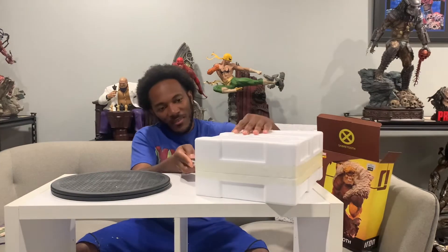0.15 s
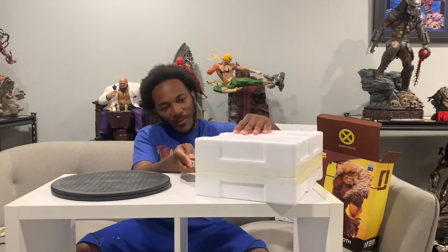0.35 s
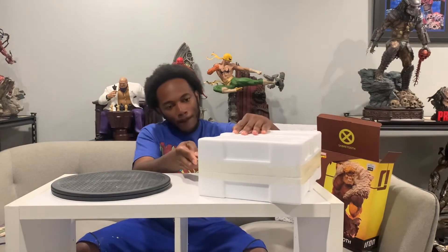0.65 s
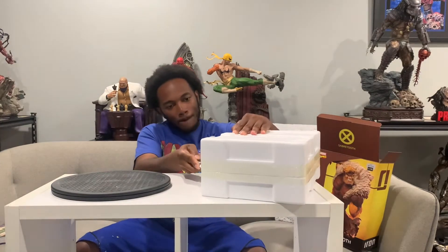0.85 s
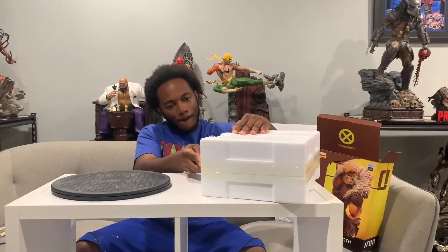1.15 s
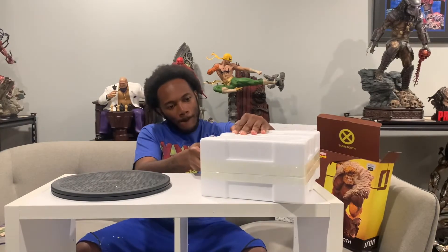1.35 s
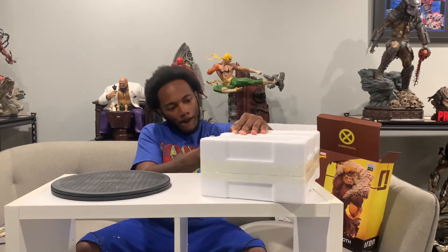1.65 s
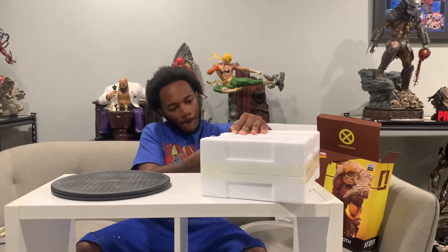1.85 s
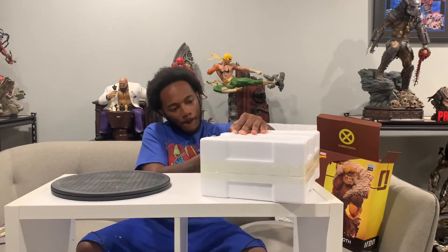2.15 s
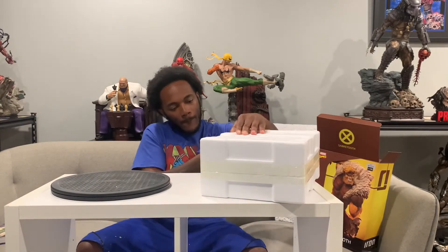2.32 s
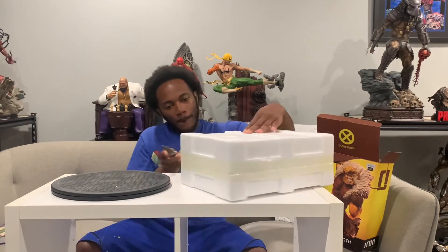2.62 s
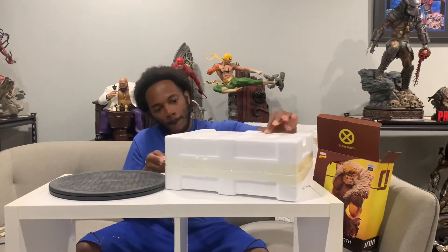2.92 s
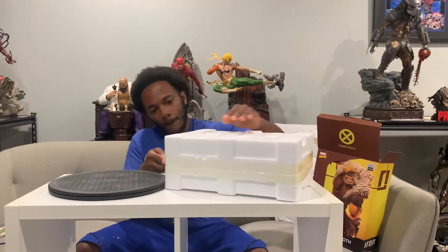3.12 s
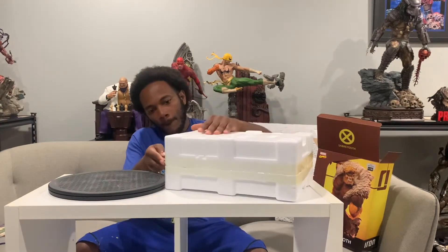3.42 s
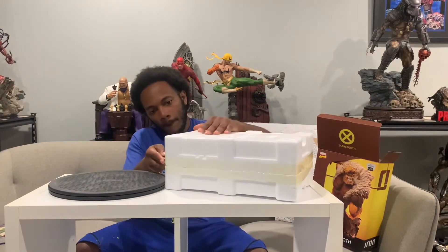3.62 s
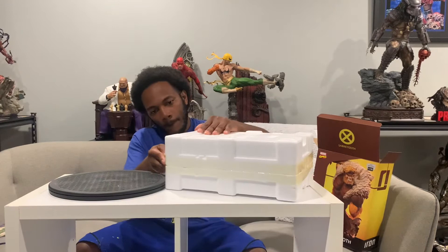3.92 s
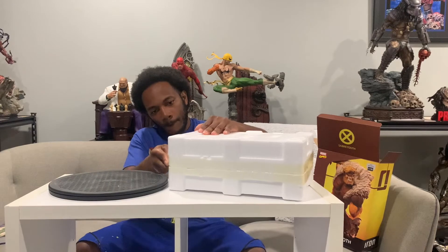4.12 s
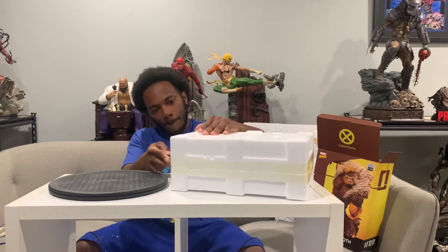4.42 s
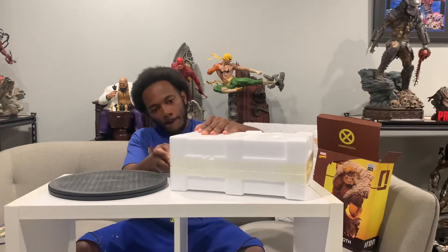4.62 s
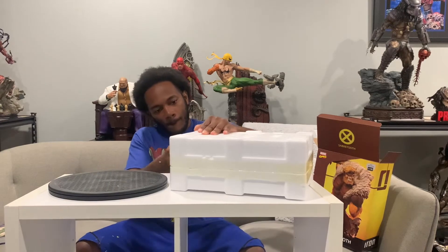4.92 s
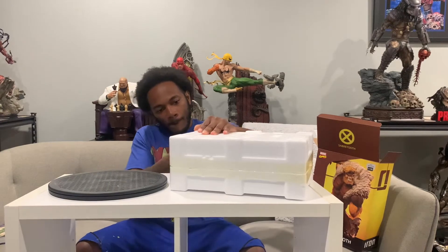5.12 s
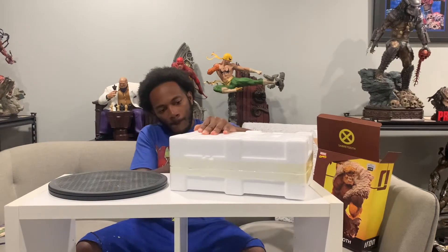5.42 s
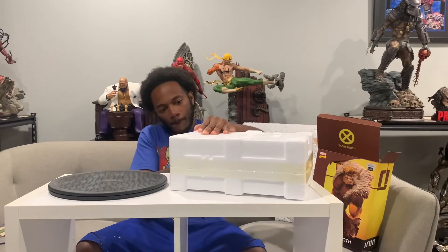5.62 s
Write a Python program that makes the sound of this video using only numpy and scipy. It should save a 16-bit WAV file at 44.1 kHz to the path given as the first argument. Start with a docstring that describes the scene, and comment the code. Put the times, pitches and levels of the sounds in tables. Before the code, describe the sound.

Dry foam rubbing and scraping on a hollow packing case, broken by snapping tape, two short harsh rips, light blade clicks and a set-down thud indoors.

```python
"""In a quiet living room a polystyrene packing case is opened on a table, with a stereo microphone across the room.
A blade ratchets out in light clicks, snaps into the packing tape, rips it twice and is drawn along the seam:
sharp cracks and volleys of slips. Between the cuts the case is slid round, set down and rubbed by a hand in
short strokes: stick-slip noise, crunches and thuds. The hollow foam colours the contacts; a low rumble and
faint hiss lie behind."""
import sys
import numpy as np
from scipy import signal
from scipy.fft import rfft, irfft, next_fast_len
from scipy.io import wavfile

SR = 44100
rng = np.random.default_rng(int(sys.argv[2]) if len(sys.argv) > 2 else 0)


def materialize(psi):
    """Save the field psi as 16-bit PCM at rate SR to the path in sys.argv[1].

    A 1-D psi becomes a single channel; in a 2-D psi each row is a channel.
    """
    bounded = np.clip(np.atleast_2d(psi).T, -1, 1)
    quanta = np.round(bounded * 32767).astype(np.int16)
    wavfile.write(sys.argv[1], SR, quanta)


N = 254310
TIME = np.arange(N) / SR

# resonances of the hollow case: (frequency [Hz], width [Hz], lift [dB])
CASE_RESONANCES = [(600, 200, 8), (758, 150, -6.5), (993, 360, 5.5), (1535, 370, 5.5), (1954, 240, 8),
                   (2513, 480, 6), (3006, 200, 5.5), (3480, 140, 4)]
# bright hiss of the finest slips: (frequency [Hz], level [dB])
HISS_COLOUR = [(2000, -22.5), (3800, -3), (4800, -1.5), (9000, -3), (15500, 2.5)]


def undb(db):
    """Decibels to gain."""
    return 10 ** (np.asarray(db) / 20)


def unit(x):
    """Scale to an rms of one."""
    return x / np.sqrt(np.mean(x ** 2))


def unit_energy(x):
    """Scale a short sound to an energy of one."""
    return x / np.sqrt(np.sum(x ** 2, axis=-1, keepdims=True))


def lookup(hz, points):
    """Read a table on a log-frequency axis."""
    f, value = np.transpose(points)
    return np.interp(np.log(hz + 1e-9), np.log(f), value)


def colour(x, points, peaks=()):
    """Causal minimum-phase filter from a spectrum outline and resonances on top of it."""
    size = 4096
    hz = np.arange(size // 2 + 1) * SR / size
    db = lookup(hz, points)
    for f, width, lift in peaks:
        db = db + lift / (1 + (2 * (hz - f) / width) ** 2)
    # folding the cepstrum forward in time makes the filter causal
    cepstrum = irfft(np.log(undb(db)))
    cepstrum[1:size // 2] *= 2
    cepstrum[size // 2 + 1:] = 0
    response = irfft(np.exp(rfft(cepstrum)))
    return signal.fftconvolve(x, response)[:len(x)]


def add(track, s, sound):
    """Mix a short sound into a track at time s."""
    start = max(int(s * SR), 0)
    track[start:start + len(sound)] += sound[:N - start]


def wander(rate):
    """Smooth random drift with an rms of one, through `rate` random points per second."""
    return unit(np.interp(TIME * rate, np.arange(N), rng.standard_normal(N)))


def slips(rate, spread_db):
    """Stick-slip: tiny releases of uneven size at random moments, `rate` per second on average."""
    happens = rng.random(N) < rate / SR
    size = undb(spread_db * np.clip(rng.standard_normal(N), -2, 2))
    direction = rng.choice([-1, 1], N)
    return unit(happens * size * direction)


def ring(modes):
    """One blow on a set of damped modes, a little different at each spot."""
    t = TIME[:SR // 4]
    detune = 1 + 0.015 * rng.standard_normal(len(modes))
    blow = np.zeros(len(t))
    for (hz, db, t60), factor in zip(modes, detune):
        blow += undb(db - 60 * t / t60) * np.sin(2 * np.pi * hz * factor * t)
    return unit_energy(blow)


def crack(travel_s):
    """A point release spreads as a bending wave: highs arrive first, 1 kHz after travel_s."""
    size = SR // 10
    khz = np.arange(size // 2 + 1) * SR / size / 1000
    cycles = 2 * travel_s * 1000 * np.sqrt(khz)  # phase lag; its slope is the delay
    return irfft(np.exp(-2j * np.pi * cycles), size)


def crackle(decay):
    """A short burst of tiny fractures, dying by a factor e in each `decay` seconds."""
    t = TIME[:SR // 10]
    return unit_energy(rng.standard_normal(len(t)) * np.exp(-t / decay))


def crackling_crack(travel_s, crackle_s, decay):
    """A crack with its crackle: the longer the crackle, the larger its share of the energy."""
    return unit_energy(crack(travel_s) + np.sqrt(decay / crackle_s) * crackle(decay))


def stroke(start, run_up, length):
    """Speed of one stroke: a smooth start, a hold and a quick stop."""
    release_db_per_s = 209.5  # every stroke dies away alike
    age = np.maximum(TIME - start, 0)
    attack = np.sin(np.pi / 2 * np.minimum(age / run_up, 1)) ** 2
    return attack * undb(-release_db_per_s * np.maximum(age - length, 0))


def room_tone():
    """A low, gently swelling rumble of the house under faint hiss, as independent mid and side."""
    # rumble and hiss of the quiet house: (frequency [Hz], level [dB])
    air_colour = [(25, -39), (38, -17.5), (52, 3.5), (72, 5), (92, -6.5), (150, -4.5), (200, -9),
                  (270, -18), (490, -24), (700, -46), (1900, -55), (2550, -41.5), (3300, -49.5),
                  (8000, -60), (16000, -63.5)]
    air = np.array([unit(colour(rng.standard_normal(N), air_colour)) for _ in range(2)])
    swell_db = 0.9 * wander(rate=3.3)
    return air * undb(-51 + swell_db)


def ticks(travel_s=0.00031, crackle_s=0.0028):
    """Light, bright clicks, each a crack with crackle: a hand landing, the blade's ratchet, small taps."""
    # each click: (time [s], level [dB], crackle decay [s])
    tick_events = [(0.497, -21, .0015), (3.193, -42, 0.008), (3.461, -48, 0.0011), (3.577, -34, 0.013),
                   (3.606, -28.5, 0.0007), (3.6665, -35, .0005), (3.7002, -32, 0.00035),
                   (3.7297, -29, 0.00037), (3.7808, -34, .0006), (3.785, -25.5, 0.0099),
                   (3.8322, -31, 0.00046), (3.8802, -34, 0.00055), (3.927, -31.5, 0.0012),
                   (4.043, -21.5, 0.0041)]
    # bright edge of a click: (frequency [Hz], level [dB])
    tick_colour = [(100, -29.5), (600, 6.5), (2500, -1.5), (5000, -3), (6500, 6.5), (8500, -2),
                   (12000, 5.5), (15500, 6)]
    out = np.zeros(N)
    for s, db, decay in tick_events:
        add(out, s, undb(db) * crackling_crack(travel_s, crackle_s, decay))
    return colour(out, tick_colour)


def bumps(scuff_db=11):
    """The light case rocks and meets the table: a hollow thud with a dry scuff of foam."""
    # each rock, set-down or jolt: (time [s], thud level [dB], scuff level against the thud [dB] before scuff_db)
    bump_events = [(0.029, -26, -8), (2.697, -12, -11.5), (2.7742, 1, -8), (2.804, -19, -4.5),
                   (2.993, -18, -37.5), (3.218, -18, -39), (3.682, -15, -33), (4.333, -3.5, -30)]
    # ring of the table under the case: (frequency [Hz], level [dB], t60 [s])
    table_modes = [(122, -33, 0.057), (163.9, 11, 0.24), (186, 16, 0.1), (250, 1, 0.078), (285, -5, 0.13),
                   (334, -0.5, 0.091)]
    # dry scuff of foam on table: (frequency [Hz], level [dB])
    scuff_colour = [(60, -2), (280, 10), (450, 5), (700, -7), (1250, -3), (1700, -4), (2600, -7),
                    (3200, -27), (15000, -40)]
    thuds, scuffs = np.zeros(N), np.zeros(N)
    for s, db, contact_db in bump_events:
        add(thuds, s, undb(db) * ring(table_modes))
        add(scuffs, s, undb(db + contact_db) * crackle(decay=0.004))
    return thuds + undb(scuff_db) * colour(scuffs, scuff_colour)


def drags(width_octaves=0.59, grip_db=2):
    """Skin sticks and slips on the foam and sounds one broad resonance, which depends on where the palm lies."""
    # each hollow rasp of the palm: (start [s], run-up [s], length [s], level [dB], centre [Hz])
    palm_drags = [(0.367, 0.077, 0.069, -46.5, 1297), (0.583, 0.015, 0.022, -47.5, 840),
                  (1.16, 0.036, 0.19, -48.5, 1060), (4.642, 0.024, 0.046, -42, 1040),
                  (5.02, .03, 0.14, -47.5, 1630)]
    grain = slips(rate=1400, spread_db=2.0) * undb(grip_db * wander(rate=70))
    out = np.zeros(N)
    for start, run_up, length, db, centre_hz in palm_drags:
        edges_hz = centre_hz * 2 ** (width_octaves * np.array([-0.5, 0.5]))
        band = signal.butter(2, edges_hz, "band", fs=SR, output="sos")
        rasp = unit(signal.sosfilt(band, grain))
        out += undb(db) * stroke(start, run_up, length) * rasp
    return out


def crunches():
    """A patch of beads collapses and sounds the hollow case; the softer the contact, the duller the crunch."""
    # the foam catches under hand or blade and gives: (time [s], level [dB], upper edge [Hz], decay [s])
    crunch_events = [(0.025, -25.5, 1550, 0.0044), (0.032, -20.5, 535, 0.015), (.465, -14, 1405, 0.013),
                     (0.6026, -17, 1370, 0.0059), (2.11, -19, 790, 0.0048), (2.303, -18, 1100, 0.0035),
                     (2.379, -23.5, 1780, 0.0054), (2.44, -17.5, 1120, 0.012), (2.497, -18.5, 1300, .008),
                     (2.768, -16.5, 1770, 0.0027), (2.779, -14.5, 2010, 0.016),
                     (3.287, -27.5, 2760, 0.0063), (3.57, -30, 2490, 0.01), (4.0128, -19, 2520, 0.0007),
                     (4.0440, -13, 1850, 0.003), (4.586, -14, 1200, 0.0083), (4.6494, -3.5, 2540, 0.002),
                     (4.678, -3, 1390, 0.017), (4.8092, -3.5, 2700, 0.0038), (4.821, -11, 2500, 0.0046),
                     (4.876, -2, 3000, 0.0048), (4.888, -10.5, 3120, 0.0076), (4.9614, -5.5, 3140, 0.004)]
    # body of a crunch: (frequency [Hz], level [dB])
    crunch_colour = [(100, -25), (230, -6), (350, 5), (600, -2.5), (1000, -0.5), (1700, -6), (3200, 1.5)]
    out = np.zeros(N)
    for s, db, edge_hz, decay in crunch_events:
        soft = signal.butter(4, edge_hz, fs=SR, output="sos")
        collapse = colour(crackle(decay), crunch_colour, CASE_RESONANCES)
        add(out, s, undb(db) * unit_energy(signal.sosfilt(soft, collapse)))
    return out


def rubbing(catch_db=-7, coarse_grip_db=1.33, fine_grip_db=1.5):
    """Foam beads catch and let go: coarse slips and rarer catches drive the hollow body, fine ones hiss."""
    # each stroke of hand or blade: (start [s], run-up [s], length [s], scratch level [dB],
    # foam body against scratch [dB], hiss against scratch [dB])
    rub_strokes = [(-.08, 0.14, 0.097, -61.5, 4, 4.5), (0.102, 0.11, 0.16, -62, 6, -8),
                   (0.222, 0.1, 0.2, -59.5, 3.5, 0.5), (0.323, 0.14, 0.16, -50, 2.5, 5.5),
                   (0.563, 0.064, 0.061, -47, 6.5, 5.5), (0.783, 0.046, 0.31, -49.5, -10.5, 0),
                   (1.1, 0.062, 0.71, -43, -1, 8.5), (1.814, 0.12, 0.16, -49.5, 2.5, 7),
                   (2.001, 0.12, 0.22, -51, 4, 8), (2.123, 0.05, 0.044, -63, -1, 38.5),
                   (2.256, 0.13, 0.27, -51.5, 5.5, 10), (2.436, 0.1, 0.34, -56, 2.5, 14),
                   (3.183, 0.014, 0.055, -65, -1, 11.5), (3.218, 0.067, 0.15, -59.5, 0, -0.5),
                   (3.424, 0.088, 0.56, -62, 6.5, -1.5), (3.939, 0.044, 0.1, -49, 6, 5.5),
                   (4.096, 0.085, 0.11, -47.5, 0, 4.5), (4.469, 0.083, 0.23, -43.5, -8, 3),
                   (4.572, 0.087, 0.13, -33.5, -2, 6.5), (4.709, 0.092, 0.3, -39, -4, 5),
                   (4.98, 0.041, 0.16, -46, -0.5, 7.5), (5.087, 0.04, 0.14, -50, 3.5, 6),
                   (5.2, 0.056, 0.12, -51.5, -1.5, 5.5), (5.305, 0.053, 0.12, -57.5, 1, 5.5),
                   (5.454, 0.072, 0.13, -45.5, -7, 7.5), (5.616, 0.086, 0.17, -60.5, 5, 8)]
    # low foam body of the rubbing: (frequency [Hz], level [dB])
    body_colour = [(60, -23), (150, -9), (300, 3.5), (550, 3.5), (1200, 1), (1550, -16.5), (2100, -37),
                   (4000, -39)]
    # scratch of the surface: (frequency [Hz], level [dB])
    scratch_colour = [(600, -31.5), (1200, -6), (1600, 2.5), (2800, 0.5), (4200, 1), (5200, -4),
                      (9000, -34.5)]
    power = np.zeros((3, N))
    for start, run_up, length, db, body_db, hiss_db in rub_strokes:
        layer_power = undb([db, db + body_db, db + hiss_db]) ** 2
        power += np.outer(layer_power, stroke(start, run_up, length) ** 2)
    scratch_gain, body_gain, hiss_gain = np.sqrt(power)
    grip = unit(wander(rate=60) + wander(rate=14))  # quick flutter on slower surges
    coarse = slips(rate=1300, spread_db=2.5)
    fine = unit(coarse + 5.7 * slips(rate=9000, spread_db=3))
    grain = coarse + undb(catch_db) * slips(rate=38, spread_db=1.0)
    body = unit(colour(grain, body_colour, CASE_RESONANCES)) * body_gain
    scratch = unit(colour(grain, scratch_colour, CASE_RESONANCES)) * scratch_gain
    hiss = unit(colour(fine, HISS_COLOUR)) * hiss_gain
    return undb(coarse_grip_db * grip) * body + undb(fine_grip_db * grip) * (scratch + hiss)


def rips():
    """The blade creeps, breaks free and races through the tape in jerks: a volley of slips shakes the case."""
    # fast rips along the seam: (break [s], level [dB], run-up [s], creep before the break [dB], hold [s],
    # decay [s], hiss against rasp [dB], shaking of the case [0-1])
    rip_events = [(0.8773, 10, 0.005, -8.5, 0.016, 0.0035, -3, .15),
                  (4.3265, 13, 0.0053, -6.5, 0.017, 0.022, 2, 0.8)]
    # rasp of the tearing tape: (frequency [Hz], level [dB])
    rip_colour = [(40, -38.5), (100, -38), (160, 0.5), (300, 1), (1000, -0.5), (2000, -2), (4200, 4),
                  (6000, -20.5), (12000, -36.5)]
    # narrow resonances that only a hard rip wakes: (frequency [Hz], width [Hz], lift at full shaking [dB])
    shaken_resonances = [(778, 14, 10), (1070, 38, 4), (1113, 30, 8.5), (1595, 70, 6), (1840, 110, 5.5),
                         (2030, 28, 9), (2400, 40, 0.5), (3550, 37, 15.5), (4153, 45, 11.5)]
    out = np.zeros(N)
    for s, db, run_up, creep_db, hold, decay, hiss_db, shake in rip_events:
        volley = slips(rate=7000, spread_db=1.5) * undb(1.5 * wander(rate=550))
        woken = [(hz, width, shake * lift) for hz, width, lift in shaken_resonances]
        before = np.maximum(s - TIME, 0)
        after = np.maximum(TIME - s - hold, 0)
        speed = np.exp(-before / run_up - after / decay)
        speed = speed * undb(np.where(TIME < s, creep_db, 0))
        rasp = unit_energy(speed * colour(volley, rip_colour, CASE_RESONANCES + woken))
        hiss = unit_energy(speed * colour(volley, HISS_COLOUR))
        out += undb(db) * (rasp + undb(hiss_db) * hiss)
    return out


def snaps(travel_s=0.001226, crackle_s=0.0014):
    """Each release is a sharp crack that crackles out while the foam wall springs back."""
    # the tape gives way under the blade: (time [s], level [dB], knock of the foam wall against it [dB],
    # crackle decay [s])
    snap_events = [(0.8069, -11.5, 4, 0.0028), (0.8521, -9.5, 5, 0.0029), (0.8794, 2.5, -3, 0.0078),
                   (1.0777, -13, 14.5, 0.0019), (1.0888, -4.5, -20, 0.001), (1.1224, -2, -2.5, 0.0036),
                   (1.1784, -4, -2, 0.0016), (1.7314, -3.5, -5.5, 0.0042), (1.8105, -1, -12, 0.0016),
                   (4.3272, 0, -7, 0.0014), (4.3445, -1.5, -12, 0.0012), (4.439, -12, -2.5, 0.0026),
                   (4.5236, -19, 4.5, 0.0022), (4.8093, -9, -5, 0.0063), (4.8750, 0, -24, 0.002),
                   (4.887, -13, -21, 0.0026)]
    # ring of a foam wall: (frequency [Hz], level [dB], t60 [s])
    wall_modes = [(510, -12, .025), (650, -9, .022), (870, -4, .018), (985, 0, .024), (1110, -4, .02),
                  (1260, -4, .016), (1620, -9, .012)]
    # sharp edge of a crack: (frequency [Hz], level [dB])
    crack_colour = [(60, -35.5), (200, -36), (500, 8.5), (1000, 9.5), (3000, 4), (6000, 6.5), (11000, 6.5),
                    (15500, 10)]
    cracks, knocks = np.zeros(N), np.zeros(N)
    for s, db, knock_db, decay in snap_events:
        add(cracks, s, undb(db) * crackling_crack(travel_s, crackle_s, decay))
        add(knocks, s + travel_s / 2, undb(db + knock_db) * ring(wall_modes))
    return colour(cracks, crack_colour) + knocks


def room(x, direct_db, side_slope=0.73, bounce_s=0.0098, bounce_db=-11):
    """Direct sound, one wall bounce and a short diffuse tail, as mid and side at the microphone."""
    # decay of the living room: (frequency [Hz], t60 [s])
    room_t60 = [(150, 0.24), (500, 0.28), (3000, 0.37), (8000, 0.32), (15000, 0.15)]
    t = TIME[:SR // 2]
    hz = np.arange(len(t) // 2 + 1) * SR / len(t)
    noise = rfft(rng.standard_normal((2, len(t))))
    octave = np.clip(np.round(np.log2(hz + 1)), 7, 14)
    tail = np.zeros((2, len(t)))
    for k in np.unique(octave):
        tail += irfft(noise * (octave == k)) * undb(-60 * t / lookup(2 ** k, room_t60))
    response = unit_energy(tail * (1 - np.exp(-t / 0.00029)))
    response[0, 1] += undb(direct_db)
    # the direct sound comes first on the right, so the difference hears its slope
    response[1, :3] += undb(direct_db) * side_slope * np.array([-1, 0, 1])
    response[0, int(bounce_s * SR)] += undb(bounce_db)
    response /= np.sqrt(np.sum(response[0] ** 2))
    return signal.fftconvolve(x[None], response, axes=1)[:, :N]


def scene():
    """Each kind of contact has its own paths through the room to the left and right channels."""
    clicks = room(ticks(), direct_db=2)
    table = room(bumps(), direct_db=5.5)
    palm = room(drags(), direct_db=7.0)
    foam = room(crunches(), direct_db=3.0)
    # the rubbing travels between two faces of the case, so its colour keeps shifting
    rub = rubbing() * undb(-2.5)
    place = 0.5 + 0.5 * np.tanh(2 * wander(rate=5.023))
    friction = room(rub * place, direct_db=0.0) + room(rub * (1 - place), direct_db=6.0)
    seam = room(rips(), direct_db=2)
    tape = room(snaps(), direct_db=0)
    mid, side = room_tone() + clicks + table + palm + foam + friction + seam + tape
    return np.array([mid + side, mid - side])


def record(dry):
    """Stereo response: little difference in the bass, narrow treble dips; deep bass and the top are cut."""
    # shared sound, with a narrow dip near 9.4 kHz: (frequency [Hz], level [dB])
    mid_response = [(5000, -1), (8000, -0.5), (8900, -5.5), (9400, -49.5), (10100, -18), (10900, -3.5),
                    (12500, 0.5), (14000, -2.5), (15500, -6.5)]
    # difference of the channels, with a narrow dip near 12.6 kHz: (frequency [Hz], level [dB])
    side_response = [(60, -13.5), (220, -11.5), (550, -3), (1300, -1), (2300, -2), (5500, -1), (9600, -0.5),
                     (11500, -3.5), (12600, -21), (13700, -12.5), (15000, -7.5)]
    size = next_fast_len(N + SR // 10)
    hz = np.arange(size // 2 + 1) * SR / size
    left, right = rfft(dry, size)
    mid = irfft((left + right) / 2 * undb(lookup(hz, mid_response)), size)[:N]
    side = irfft((left - right) / 2 * undb(lookup(hz, side_response)), size)[:N]
    high_pass = signal.butter(4, 42, "high", fs=SR, output="sos")
    low_pass = signal.ellip(8, 0.2, 70, 15700, fs=SR, output="sos")  # 0.2 dB ripple, 70 dB stop band
    stereo = np.array([mid + side, mid - side])
    return signal.sosfilt(np.vstack([high_pass, low_pass]), stereo)


dry = scene()
out = record(dry)
materialize(out)
```